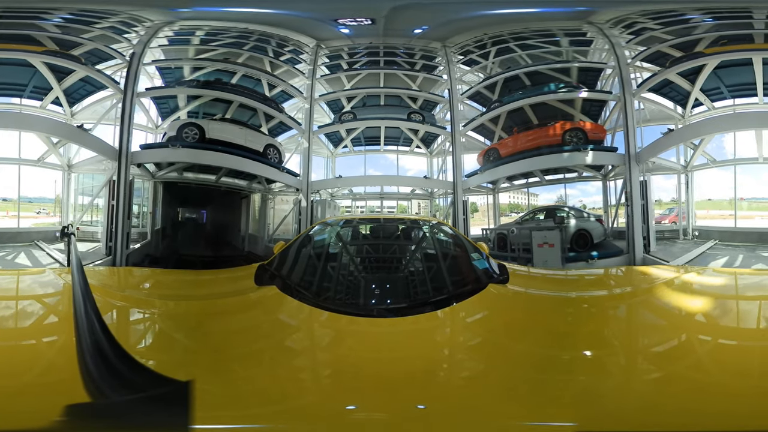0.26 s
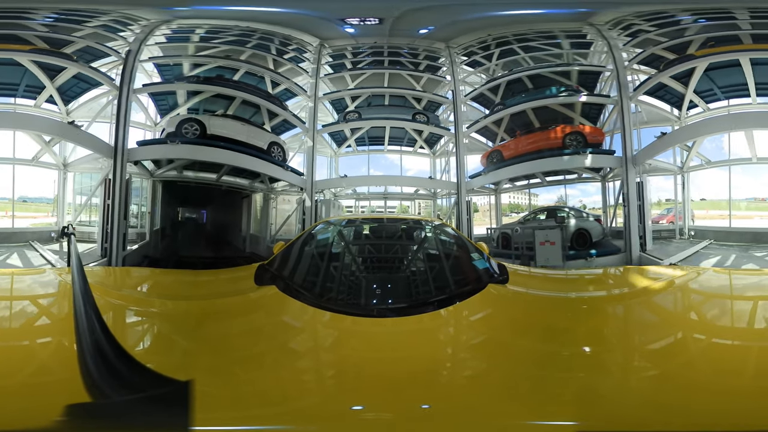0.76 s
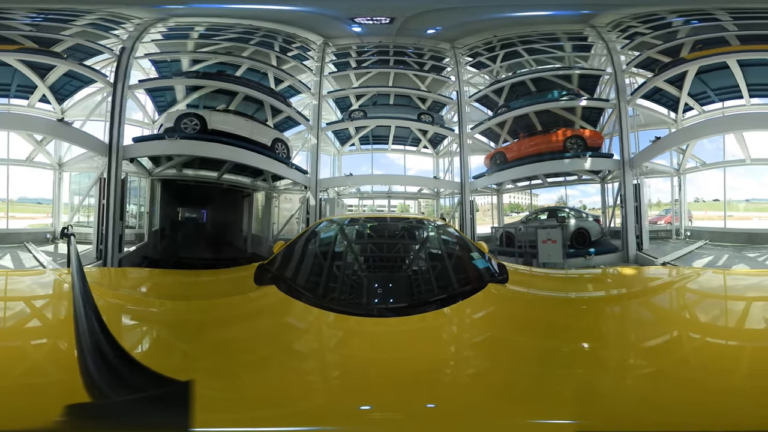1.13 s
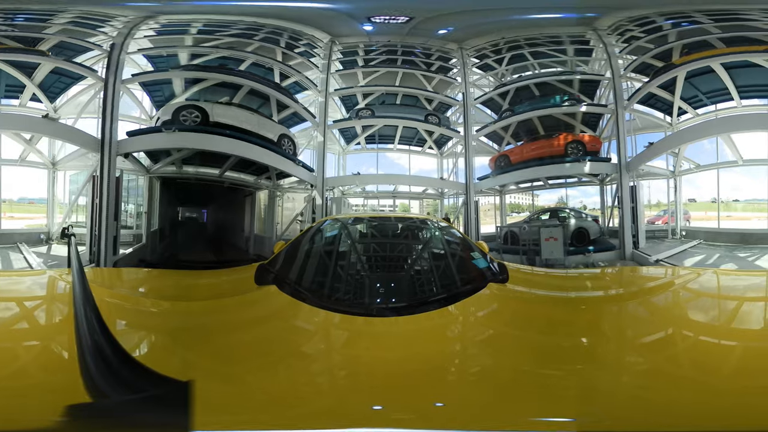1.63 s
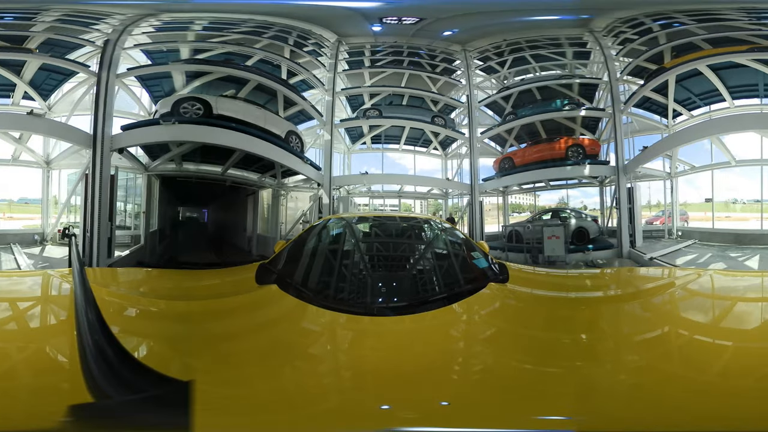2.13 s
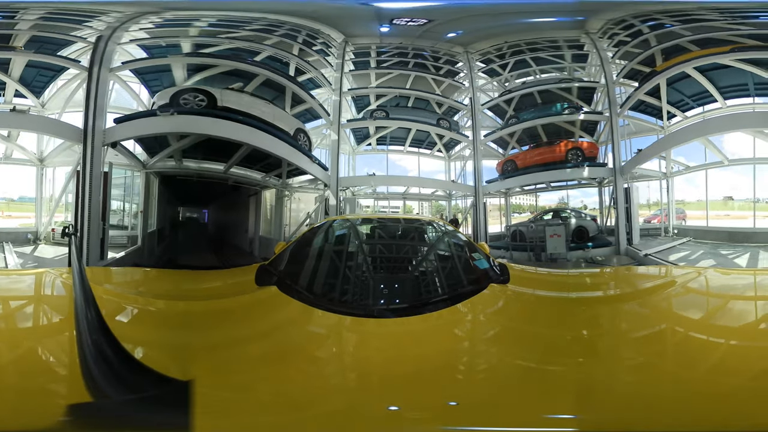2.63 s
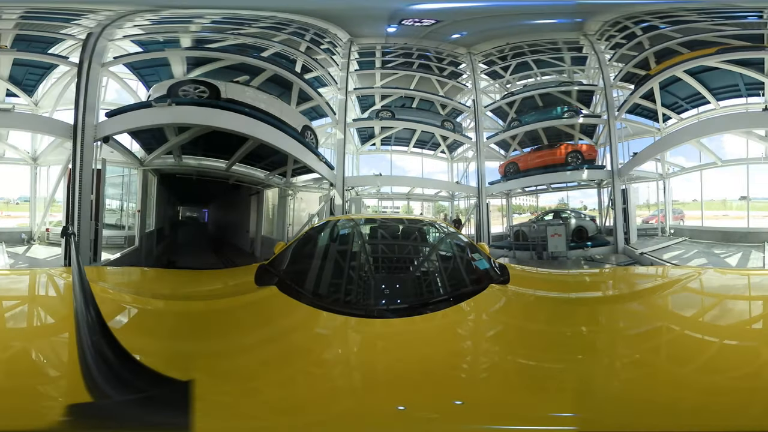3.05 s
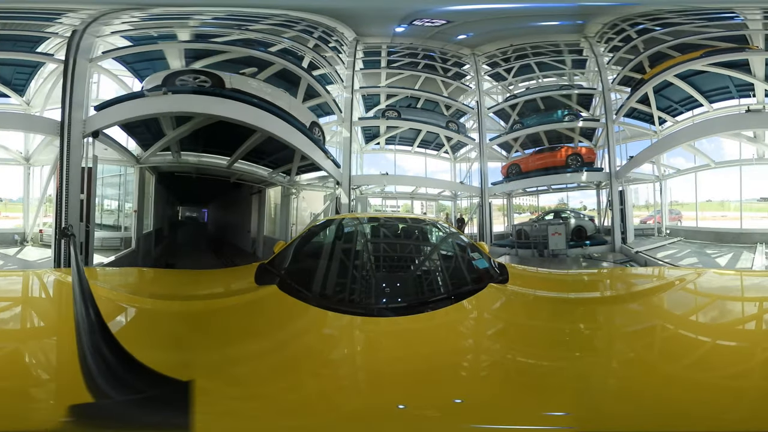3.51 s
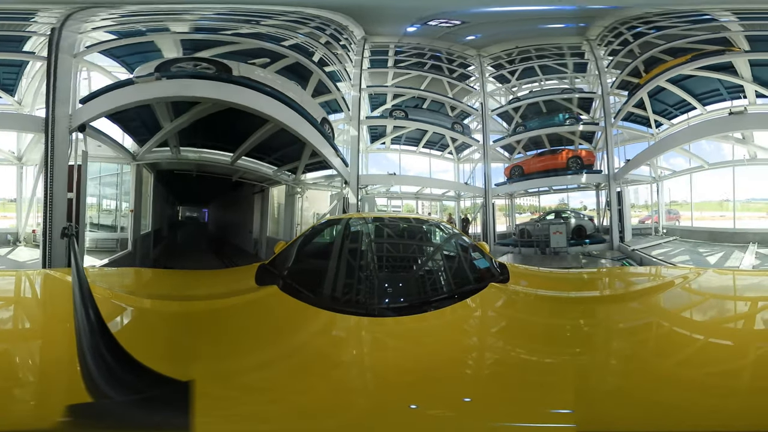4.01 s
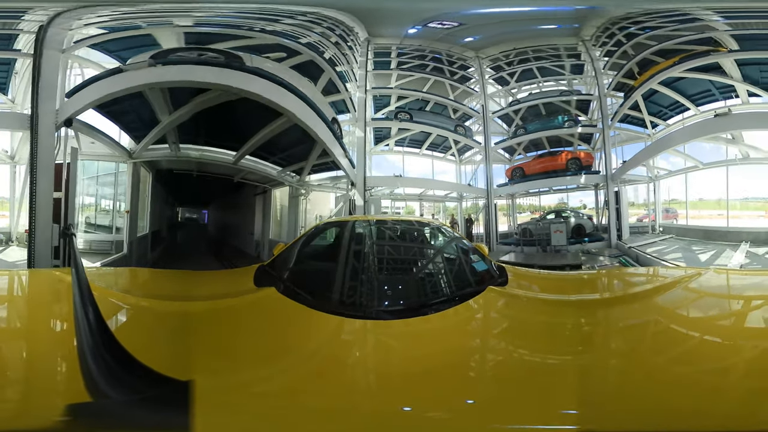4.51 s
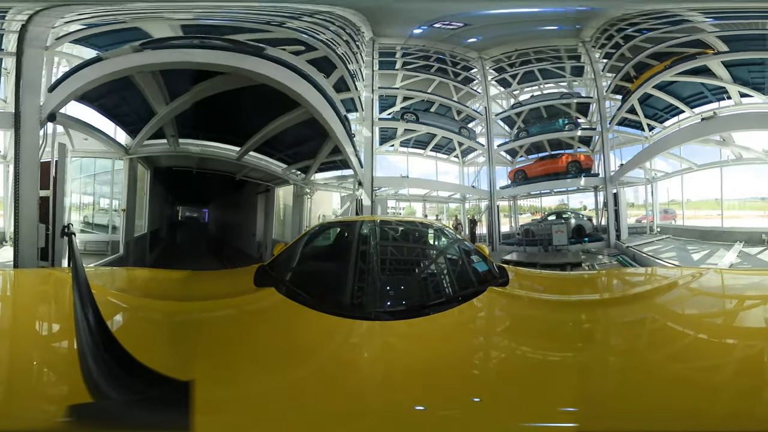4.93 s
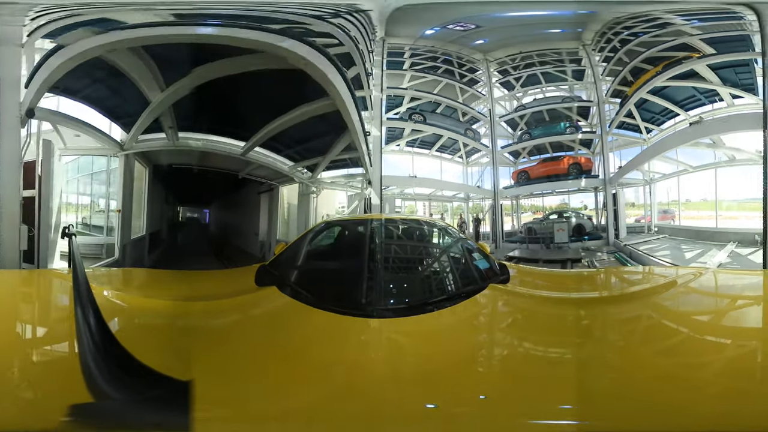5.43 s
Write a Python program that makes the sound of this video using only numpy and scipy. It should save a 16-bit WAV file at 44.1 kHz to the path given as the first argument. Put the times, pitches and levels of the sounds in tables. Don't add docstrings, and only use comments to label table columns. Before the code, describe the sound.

Inside a large glass and steel tower, a car lift runs with a steady rumbling whir and faint gear tone. A mount joint right beside the stereo microphone creaks in irregular clicks with dull body thuds. Midway the clicks chatter, then hard clacks make the whole level drop; brittle ticks remain over a much quieter whir.

```python
import sys
import numpy as np
from scipy import signal
from scipy.fft import rfft, irfft
from scipy.io import wavfile
from scipy.ndimage import uniform_filter1d

SR = 44100
rng = np.random.default_rng(int(sys.argv[2]) if len(sys.argv) > 2 else 0)


def ratio_of_db(decibels):
    return 10 ** (np.asarray(decibels, float) / 20)


def persist_wave(psi):
    counts = np.round(np.clip(psi, -1, 1) * 32767).astype(np.int16)
    wavfile.write(sys.argv[1], SR, np.atleast_2d(counts).T)


N = 250047

# time in seconds, drive effort in dB, gear mesh in dB,
# strain on the mount joint in dB.
LIFT_RUN = [(0, -17, -32, -42), (.45, -17.5, -50, -40), (.9, -19, -52.5, -29), (1.2, -21, -31, -26.5),
            (1.5, -20.5, -24, -24), (1.8, -22, -25.5, -21), (2.1, -20.5, -25.5, -26),
            (2.4, -19.5, -24, -13.5), (2.7, -19.5, -15, -22), (3.3, -16, -23, -23),
            (3.6, -18.5, -25, -28.5), (3.9, -18, -28, -20), (4.2, -21.5, -18, -12.5),
            (4.5, -18.5, -38, -18.5), (4.8, -21, -44, -14), (5.1, -15.5, -32, -16.5),
            (5.67, -17.5, -37, -16)]
# frequency in Hz, level in dB.
RUMBLE_SPECTRUM = [(15, -50), (25, -26), (40, -14.5), (55, -1.5), (72, -1.5), (90, 1.5), (125, -3),
                   (156, 2.5), (200, -3.5), (280, -19), (430, -62), (900, -130)]
# frequency in Hz, level in dB per Hz.
WHIR_SPECTRUM = [(150, -26), (260, -5), (325, -11), (403, -1.5), (468, -3.5), (499, -0.5), (573, -1),
                 (666, -1.5), (860, -8), (1160, -4.5), (1410, -12), (1650, -8.5), (1980, -14), (2560, -13),
                 (3340, -18), (4340, -28), (7350, -120)]
# frequency in Hz, level in dB per Hz.
HISS_SPECTRUM = [(2500, -21), (3500, 6), (4300, -1), (5000, -1.5), (6000, -8.5), (7000, -20.5), (8000, -15),
                 (8600, -22.5), (9200, -53), (10250, -70.5), (10500, -28.5), (12200, -34), (13200, -37),
                 (16000, -39.5)]
# frequency in Hz, side minus mid in dB.
SIDE_SHARE = [(60, -21), (100, -17), (160, -3.5), (230, -7), (330, -12), (600, -19.5), (1300, -21),
              (2500, -29), (3600, -21.5), (4500, -6.5), (8000, 3), (14000, -2)]
# frequency in Hz, rms level in dB.
INVERTER_LINES = [(3714, -60), (3907, -60), (4005, -61), (5913, -63), (6002, -59), (6094, -67),
                  (8010, -63.5), (8110, -69)]

# start in seconds, click peak in dB, arm thud relative to it in dB, shell
# tick relative to it in dB, brightness in dB per octave.
JOINT_SLIPS = [(0.214, -20, 12.5, -19, 2), (0.497, -24, 12, -19, 0), (0.56, -24, 10, -19, 1),
               (0.594, -17, 5.5, -20, 0), (0.628, -20, 1.5, -17, -1), (0.863, -15, 8, -26, -1),
               (0.9459, -20, 6, -5.5, 1), (1.0784, -16.5, 4, -14, -2), (1.1476, -11, -1.5, -24, -5),
               (1.2437, -12.5, -6, -14, -9), (1.274, -27, 4, -19, 0), (1.308, -23, 14, -18, 0),
               (1.377, -27, 6, -20, 2), (1.431, -9.5, 0.5, -7, -9.5), (1.6678, -19.5, 8, -9.5, -1),
               (1.7241, -17.5, -4, -16, 1), (1.757, -10.5, -20, -17.5, 4), (1.8178, -16, -20.5, 3.5, -3),
               (1.8431, -23.5, 7, 1, 0), (1.864, -13.5, 4.5, -15.5, -3), (1.8858, -7, 0, -18, 2),
               (1.9007, -15.5, -1, -10.5, -2), (1.922, -16, 4.5, 2.5, 0), (1.9346, -20.5, 2, -10, 0),
               (1.9917, -25, 7, -9, 0), (2.219, -10.5, 0.5, -1, -6), (3.235, -20.5, 4, -12, 1),
               (3.3677, -18, 12.5, -10, -1), (3.4033, -20.5, 8.5, -22, -1), (3.421, -7, -2, -28, -3),
               (3.4285, -17, -12.5, -21, 0), (3.4501, -22.5, 19.5, -11, -1), (3.493, -24, 11.5, -20, 0),
               (3.5172, -27, 11, -1.5, 0),
               (2.3494, -29, -8, -4, 0), (2.3762, -15.5, -4, -11, 8), (2.396, -24.5, -11, 4.5, 2),
                 (2.4214, -15.5, -5, -8.5, 3), (2.444, -20, 2, -3, 0), (2.4545, -13.5, -6.5, -7.5, -5),
                 (2.461, -16, -4, -7.5, -3), (2.5009, -10.5, -7, -14, 0), (2.5113, -21, 3.5, -1.5, -2),
                 (2.5242, -15.5, -7, -7.5, -2), (2.5578, -25.5, 5.5, -12, -2), (2.6917, -22.5, 0, -11, 4),
                 (2.7066, -15.5, -2.5, -13, 0), (2.7686, -25.5, 5, -19, 0), (2.891, -19.5, 3.5, -19, -2),
                 (2.9062, -20, 1, -13, -3),
               (3.744, -15.5, 11, -13, -3), (3.7589, -13, -2, 0, 0), (3.825, -22.5, 12.5, -7, -2),
                   (3.85, -23.5, 12.5, -29, 0), (3.8636, -9.5, -10, 2.5, 11), (3.882, -12.5, -2.5, -7.5, 9),
                   (3.902, -9.5, -8, -12.5, 0), (3.9127, -21.5, -5, 5, 0), (3.961, -20.5, -4, -15, 0),
                   (4.0535, -13.5, -4, -7, -10), (4.0667, -20.5, -2, -19, 0), (4.079, -26, -19, -25, -4),
                   (4.144, -19.5, 2.5, -4, 5), (4.1656, -16.5, -21, -10.5, -8), (4.205, -19, 3.5, -14, -7),
                   (4.2287, -24, 2, -9, 3), (4.2394, -16.5, -15, -13, 2), (4.248, -19, -8, 1, 2),
                   (4.263, -8, -9, -6, -5), (4.267, -20, -19, 7, -5), (4.293, -33.5, -18, 3, 7),
                   (4.431, -24, 4, -13, -11), (4.4555, -28, -6, -9, 0), (4.484, -26, -1, -6, -4),
                   (4.503, -22.5, 2, -8, 0), (4.5126, -25, -3, 1, 0), (4.5265, -16.5, -15, -4, 2),
                   (4.5412, -17, -9, 3, 2), (4.55, -11, -11, -4, 2), (4.558, -18, -7.5, -2, 4),
               (4.5762, -25.5, -11, 2, 5), (4.598, -28.5, -3, 2, 2), (4.618, -23, -4, -8, 0),
              (4.6324, -31, -8, 6.5, 4), (4.699, -23.5, -21, -18, 15), (4.709, -29.5, -14, 10.5, 12),
              (4.79, -31, -5, 1, 2), (4.8262, -17.5, -8.5, -11.5, 3), (4.86, -30, -3, -9, 2),
              (4.895, -29.5, -13, 7.5, 4), (4.9097, -27, -8, 1.5, 8), (4.949, -28, -5, -11, 3),
              (4.964, -12.5, -19, -5, 24), (4.971, -30, -8, -7, 6), (4.9799, -18.5, -8, 8.5, 0),
              (4.9911, -19, -8, -3, 4), (5.0108, -33, -8, -1, 4), (5.0554, -28, -9, -16, -1),
              (5.14, -29.5, -6, -5, 12), (5.1587, -34, -2, 2, 3), (5.1997, -31.5, -16, 1, 6),
              (5.2901, -23, -6, -13, 6), (5.397, -31, -2, -11, 8), (5.41, -13.5, -7, 2.5, 23),
              (5.4207, -25, -8, -5, -2), (5.439, -25, -6, -18, -2), (5.4664, -25, -5.5, -17, 5),
              (5.5961, -22, -11, 3.5, 12), (5.6, -24.5, -15, 3.5, 12), (5.6342, -22.5, -1.5, -16, 4),
               (4.04, -40, 6, -12, 0), (4.088, -43, -8, -7, 2), (4.345, -34.5, 6, -12, -3),
               (4.358, -36, -3, -6, -3), (4.388, -34.5, 4, -9, -3), (4.641, -31, -3, -18, -2),
               (4.661, -36, -8, -1, -4), (4.72, -40, -14, 7, 8), (4.729, -49, -15, 3, 6),
               (4.778, -43, -1, -8, 2), (4.8, -36, 3, -4, 0), (4.885, -36, 4, -1, 0),
               (4.918, -29, -8, -6, 0), (5.0179, -29.5, 1.5, -20, 3), (5.032, -41, 4, -12, 0),
               (5.1917, -38, -10, -11, 0), (5.277, -40, -8, -14, -8), (5.302, -42, -10, -12, -6),
               (5.36, -44, -6, 0, 0), (5.3724, -31, -10, -11, 6), (5.452, -40, 4, -12, 0),
               (5.5342, -37, 5, -8, 0), (5.545, -39, 4, 0, 4), (5.5701, -42, -8, -2, 0),
               (5.5823, -36, -8, 2, 0), (5.612, -35, -8, -8, 4)]

# mode in Hz, level in dB, 60 dB decay in seconds, left minus right in dB,
# phase lead of the right in radians.
SWAY_MODES = [(168, -1, 0.29, -5, 2.74), (208, -1.5, 0.04, 0, 3.4), (127.4, -7.5, 0.15, -12, 0.99)]
# mode in Hz, level in dB, decay in seconds, left minus right in dB, right lead in radians.
ARM_MODES = [(492, -25.5, 0.13, -10, .1), (606, -11.5, 0.045, -17.5, 0.088), (666, 6, 0.037, -2.5, 0.039),
             (783, -2, 0.031, -4, .05)]
# mode in Hz, level in dB, decay in seconds, left minus right in dB, right lead in
JOINT_MODES = [(1344, -12, 0.056, 6, 0.56), (1658, 0.5, 0.044, 2, 0.74), (1950, -6, 0.019, 7, 0.2),
               (2136, -9.5, 0.015, 21.5, 0.079), (2280, -1.5, 0.024, -3.5, 0.28),
               (2610, -5.5, 0.014, 8, -0.61), (2897, -6, 0.024, 2, -1.05), (3050, -15, 0.0066, 2.5, -2),
               (3460, -14, 0.015, 7.5, -1.6)]
# mode in Hz, level in dB, decay in seconds, left minus right in dB, right lead in
SHELL_MODES = [(4480, -1.5, 0.008, 3, -0.5), (4590, 4, 0.017, -3.5, -2.5), (5210, 4.5, 0.006, -1, 6.5),
               (5650, -1.5, 0.0041, -4.5, 1.0), (6230, -1, 0.0041, -14.5, 1.47),
               (6600, -11.5, .004, -12.5, 3), (7350, -14.5, 0.0036, -10, -8),
               (8700, -14, 0.0029, -17.5, 13)]
# mode in Hz, level in dB, decay in seconds, left minus right in dB, right lead
EDGE_MODES = [(9700, 8, 0.0023, -0.5, 1.3), (11000, -3.5, .002, 0.5, 1.3), (12300, -7, .002, 3, .9),
              (13400, -6.5, .002, -2, .9), (14500, -2, .002, -5, .9), (15300, -1, .002, -2.5, .9)]
# mode in Hz, level in dB, decay in seconds, left minus right in dB, right lead in radians.
BODY_MODES = [(86, -1, .12, 0, .05), (140, -1, .08, -0.5, .3), (280, -7.5, 0.045, -3, .1),
              (410, -12, .07, -1, .1)]

# start in seconds, peak in dB, brightness in dB per octave.
CARRIAGE_BUMPS = [(1.263, -8, 0), (1.41, -7, 0), (1.547, -9, 0), (2.056, -17, 0), (2.188, -16, 0),
                  (2.209, -16, 0), (2.835, -17, 0), (3.364, -10, 0), (3.739, -5, 0), (3.806, -11, 0),
                  (3.859, -14, 0), (4.129, -21, 0), (4.204, -19, 0), (4.249, -26, 0), (4.779, -26, 0),
                  (4.899, -28, 0), (5.126, -34, 0), (5.248, -23, 0), (5.319, -31, 0), (5.387, -25, 0)]
# time in seconds, peak in dB.
EDGE_TICKS = [(1.4407, -52), (2.2284, -51), (3.8726, -42), (4.0632, -65), (4.2618, -59), (4.2722, -49),
              (4.5511, -50), (4.5511, -38), (4.6085, -77), (4.6429, -82), (4.7182, -76), (4.9726, -49),
              (4.9886, -36), (5.4166, -57), (5.4196, -42), (5.6057, -68)]
# time in seconds, gain just after in dB.
GAIN_FALLS = [(1.441, -5.5), (1.827, -7), (1.93, -11.5), (2.23, -16.5), (2.536, -15.5), (3.442, -7.5),
              (3.769, -8.5), (3.874, -17.5), (3.914, -20), (4.065, -20), (4.274, -25.5), (4.557, -27.5),
              (4.719, -25.5), (4.991, -33.5), (5.209, -27), (5.42, -31), (5.607, -30.5)]
# frequency in Hz, level in dB.
TREBLE_DIP = [(8700, 0), (9200, -14), (10250, -16), (10500, 0)]

TREBLE_LAG_S = 0.0101
TILT_HZ = 2300


def unit(x):
    return x / np.sqrt(np.mean(x ** 2))


def walk(rate):
    k = int(SR / rate)
    held = np.repeat(rng.standard_normal(N // k + 1), k)
    return 1.332 * uniform_filter1d(uniform_filter1d(held, k), k)[:N]


def bumps(rate, spread_db):
    hit, size, sign = rng.random((3, N))
    strength = ratio_of_db(-spread_db * np.log(size + 0.036))
    return unit((hit < rate / SR) * strength * np.sign(sign - 0.4))


def colour(x, points, width=False):
    size = 4096
    loghz = np.log(np.maximum(np.fft.rfftfreq(size, 1 / SR), 1))
    hz, level_db = np.transpose(points)
    db = np.interp(loghz, np.log(hz), level_db)
    if width:
        hz, side_db = np.transpose(SIDE_SHARE)
        db = db + np.interp(loghz, np.log(hz), side_db)
    cepstrum = irfft(np.log(ratio_of_db(db)))
    cepstrum[1:size // 2] *= 2
    cepstrum[size // 2 + 1:] = 0
    return signal.fftconvolve(x, irfft(np.exp(rfft(cepstrum))))[:N]


def steady(points, rate, spread_db, knock_share, flicker_db):
    drive = rng.standard_normal(N) + knock_share * bumps(rate, spread_db)
    mid = colour(drive * ratio_of_db(flicker_db * walk(14)), points)
    side_noise = rng.standard_normal(N) * ratio_of_db(flicker_db * walk(17))
    side = colour(side_noise, points, width=True) * np.std(drive)
    return np.array([mid + side, mid - side]) / np.std(mid)


def tone(hz, wobble_hz):
    return np.sqrt(2) * np.sin(2 * np.pi * np.cumsum(hz + wobble_hz * walk(25.17)) / SR)


def frame_rumble(effort_db):
    build_db = -11.5 * np.exp(-np.arange(N) / SR / 1.16)
    level_db = -16 + build_db + 0.4 * (effort_db + 20)
    return ratio_of_db(level_db) * steady(RUMBLE_SPECTRUM, 40, 1.2, 0.16, 2.0)


def drive_whir(effort_db):
    return ratio_of_db(effort_db) * steady(WHIR_SPECTRUM, 400, 3.34, 0.55, 0.54)


def roller_hiss(effort_db):
    return ratio_of_db(-41 + 0.9 * (effort_db + 20)) * steady(HISS_SPECTRUM, 670, 3.0, 0.15, 0.63)


def gear_mesh(gear_db):
    settles_s = 1.46
    hz = 562 + 19 * (np.arange(N) < settles_s * SR)
    return ratio_of_db(gear_db - 1.5 + 2.5 * walk(25)) * tone(hz, 2.5)


def inverter():
    sound = np.zeros((2, N))
    fading_db = -2.5 * np.arange(N) / SR
    for hz, db in INVERTER_LINES:
        level = ratio_of_db(db + fading_db + 2.6 * walk(9))
        sound += level * np.array([tone(hz, 5.0), tone(hz, 5.0)])
    return sound


def lift(effort_db, gear_db):
    sound = frame_rumble(effort_db) + drive_whir(effort_db) + roller_hiss(effort_db)
    sound = sound + gear_mesh(gear_db) + inverter()
    sound = np.array([sound[0], np.roll(sound[1], 2)])
    return sound * ratio_of_db(np.array([[-0.4], [0.4]]))


def ring(modes, at, db, rub_s, crumbs, low_hz, top_hz, scatter_db, tilt_db, snap=11, tail=0.034):
    out = np.zeros((2, N))
    t = np.arange(900) / SR
    index = np.minimum(at[:, None] + np.arange(len(t)), N - 1).ravel()
    rub = np.exp(-t / rub_s[:, None]) + tail * np.exp(-t / (3.4 * rub_s[:, None]))
    grit = rub * rng.standard_normal(rub.shape)
    grit[:, 0] = snap
    for hz, mode_db, t60, pan_db, lead in modes:
        pole = np.exp((2j * np.pi * hz - np.log(1000) / t60) / SR)
        energy = np.sum(np.abs(signal.lfilter([1], [1, -pole], grit)) ** 2, axis=1)
        reach = np.sqrt(energy * (1 - abs(pole) ** 2))
        strike_db = db + tilt_db * np.log2(hz / TILT_HZ) + scatter_db * rng.standard_normal(len(at))
        size = ratio_of_db(strike_db) / reach
        push = np.bincount(index, (size[:, None] * grit).ravel(), N) + crumbs
        lean = ratio_of_db(4 * min(hz / 5000, 1) * walk(40) / 2)
        left = ratio_of_db(mode_db) * signal.lfilter([1], [1, -pole], push * lean)
        right = ratio_of_db(mode_db) * signal.lfilter([1], [1, -pole], push / lean)
        out[0] += ratio_of_db(pan_db / 2) * left.imag
        out[1] += ratio_of_db(-pan_db / 2) * (right * np.exp(1j * lead)).imag
    band = signal.butter(4, [low_hz, top_hz], "band", fs=SR, output="sos")
    return signal.sosfilt(band, out) / np.sqrt(2 * np.sum(ratio_of_db(np.array(modes)[:, 1]) ** 2))


def creak(strain_db):
    slips = JOINT_SLIPS
    s, click_db, arm_db, shell_db, bright_db = np.transpose(slips)
    at = (s * SR).astype(int)
    click_db = click_db - gain_db()[at]
    arm_db = click_db + arm_db
    shell_db = click_db + shell_db
    edge_db = shell_db - 26.5 + 0.9 * shell_db
    rub_s = np.clip(3.8 * ratio_of_db(0.1 * shell_db), 0.1, 6) / 1000
    snaps = bumps(900, 4.1) * ratio_of_db(2.8 * walk(45)) / 10
    crowd_db, crowd_late_s = -15, 0.0041

    def part(modes, db, crowd_db, between_db, low_hz, top_hz, share=1, tilt_db=0, **rub):
        near = signal.fftconvolve(np.bincount(at, ratio_of_db(db), N), np.hanning(int(0.024 * SR)), "same")
        crowd = np.roll(np.abs(near), int(crowd_late_s * SR))
        crumbs = snaps * (ratio_of_db(crowd_db) * crowd + ratio_of_db(strain_db + between_db))
        return ring(modes, at, db, rub_s * share, crumbs, low_hz, top_hz, 1.97, tilt_db, **rub)

    sway = part(SWAY_MODES, arm_db - 9.5, crowd_db, -2.8, 58, 350)
    arm = part(ARM_MODES, arm_db + 2.5, crowd_db, 1.3, 380, 1340)
    joint = part(JOINT_MODES, click_db - 0.5, crowd_db, -7.0, 1194, 3800, tilt_db=bright_db)
    shell = part(SHELL_MODES, shell_db + 3.5, crowd_db - 6, -13.0, 3060, 8740,
                 share=0.81, tilt_db=0.13 * bright_db, snap=6.0, tail=0.01)
    edge = part(EDGE_MODES[:3], edge_db - 2.5, 2 * crowd_db, -60, 7300, 13500,
                share=0.25, snap=3.0, tail=0)
    return sway + arm + joint + shell + edge


def thumps():
    s, db, tilt_db = np.transpose(CARRIAGE_BUMPS)
    at = (s * SR).astype(int)
    db = db - 5 - gain_db()[at] + tilt_db * np.log2(TILT_HZ / BODY_MODES[1][0])
    return ring(BODY_MODES, at, db, np.full(len(at), 0.004), 0, 40, 520, 0.97, tilt_db)


def edge_ticks():
    s, db = np.transpose(EDGE_TICKS)
    at = ((s - TREBLE_LAG_S) * SR).astype(int)
    db = db - 4 - gain_db()[at]
    return ring(EDGE_MODES[3:], at, db, np.full(len(at), 0.0012), 0, 12000, 15850, 1.5, 0, snap=3.0, tail=0)


def gain_db():
    recover_db_s, drop_s = 13.5, 0.0013
    t, db = np.arange(N) / SR, np.zeros(N)
    for s, after_db in GAIN_FALLS:
        db = np.where(t >= s, np.minimum(0, after_db + recover_db_s * (t - s)), db)
    return uniform_filter1d(db, int(drop_s * SR))


def scene():
    t = np.arange(N) / SR
    s, *columns = np.transpose(LIFT_RUN)
    effort_db, gear_db, strain_db = (np.interp(t, s, c) for c in columns)
    return lift(effort_db, gear_db) + creak(strain_db) + thumps() + edge_ticks()


def band_limit(x):
    return signal.sosfilt(signal.butter(12, 15870, fs=SR, output="sos"), x)


def record(dry):
    low = signal.sosfiltfilt(signal.butter(6, 3780, fs=SR, output="sos"), dry)
    late = np.pad(dry - low, ((0, 0), (int(TREBLE_LAG_S * SR), 0)), "reflect")[:, :N]
    x = np.tanh(0.83 * (low + late) * ratio_of_db(gain_db())) / 0.76
    x = np.array([colour(channel, TREBLE_DIP) for channel in x])
    x = signal.sosfilt(signal.ellip(8, 0.3, 60, 15800, fs=SR, output="sos"), x)
    return band_limit(x)


dry = scene()
out = record(dry)
persist_wave(out)
```